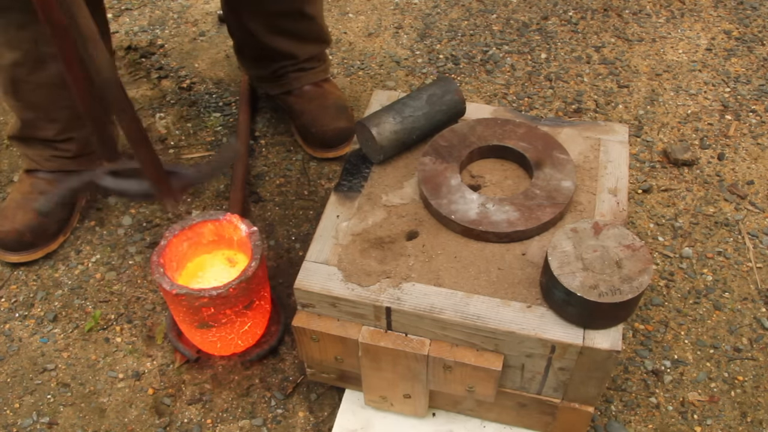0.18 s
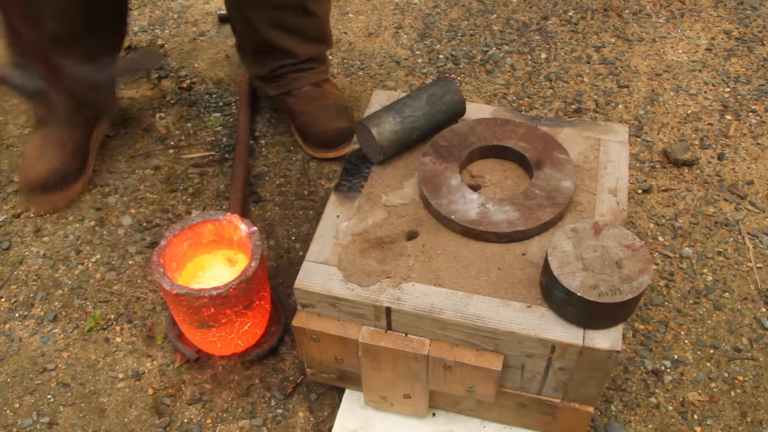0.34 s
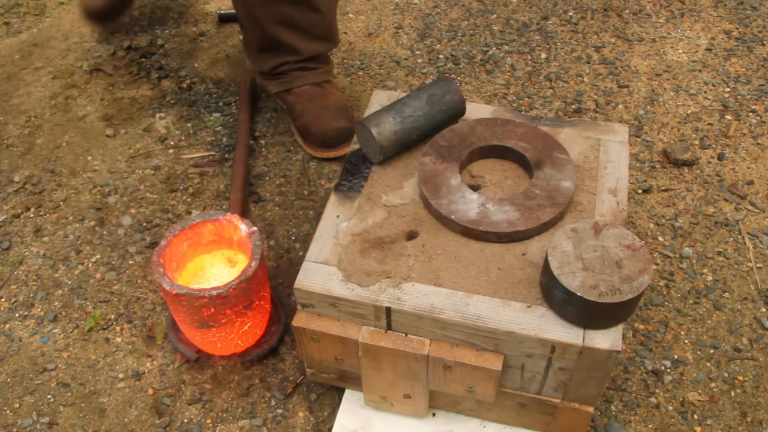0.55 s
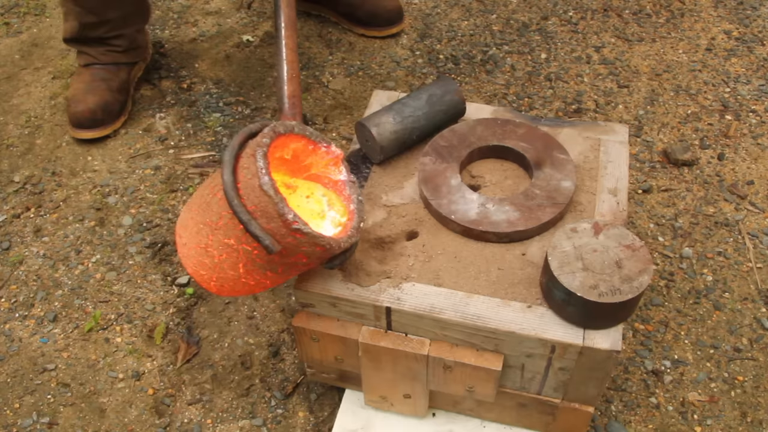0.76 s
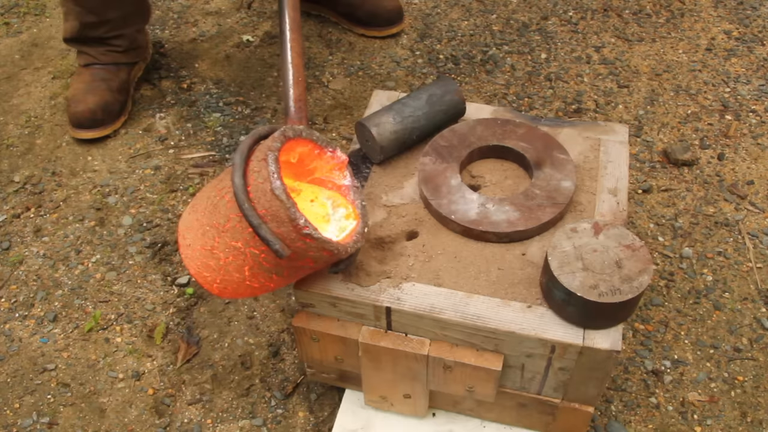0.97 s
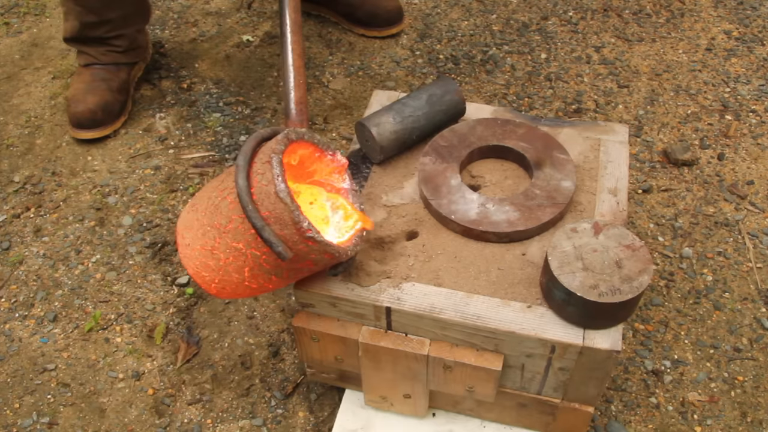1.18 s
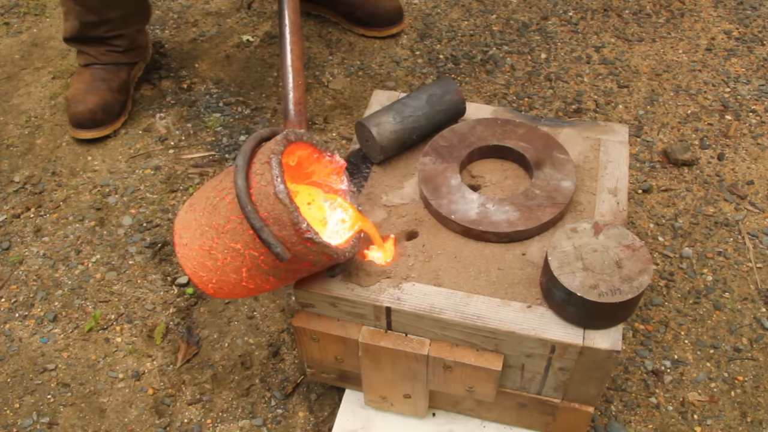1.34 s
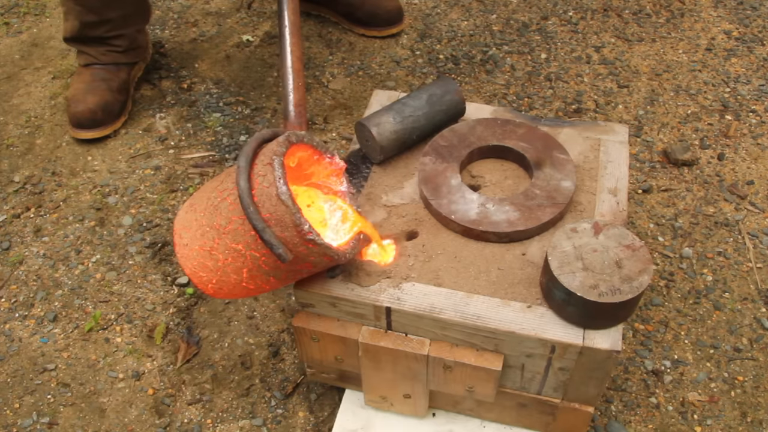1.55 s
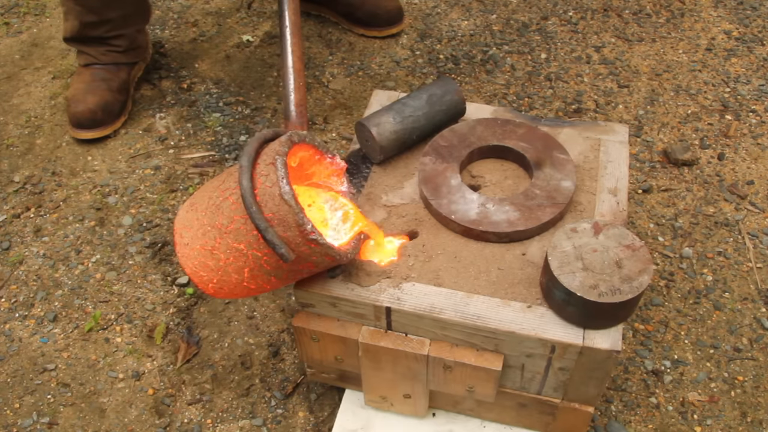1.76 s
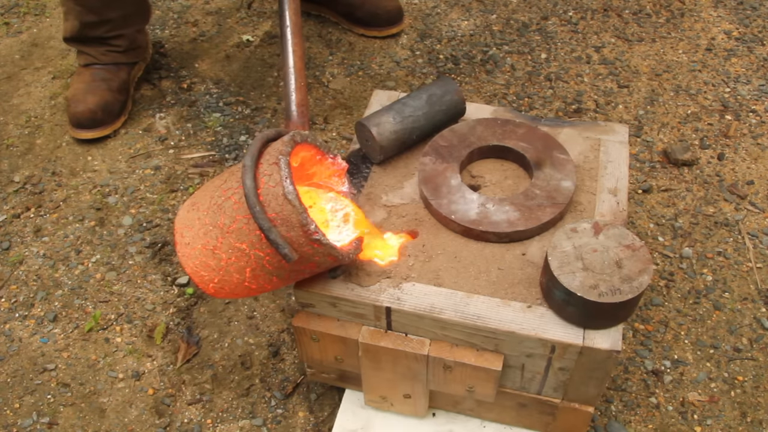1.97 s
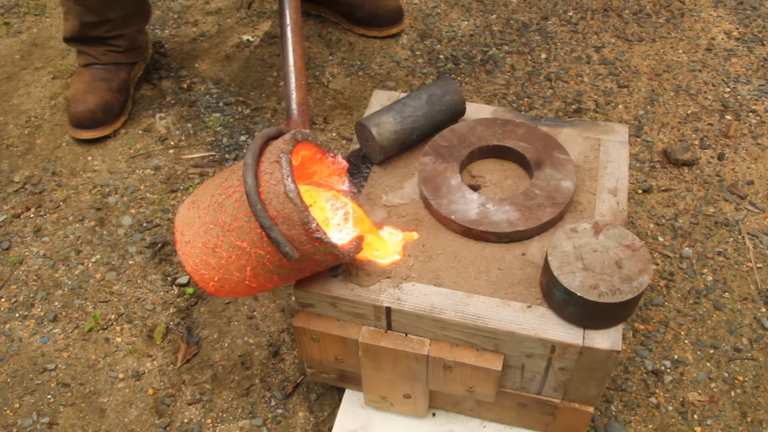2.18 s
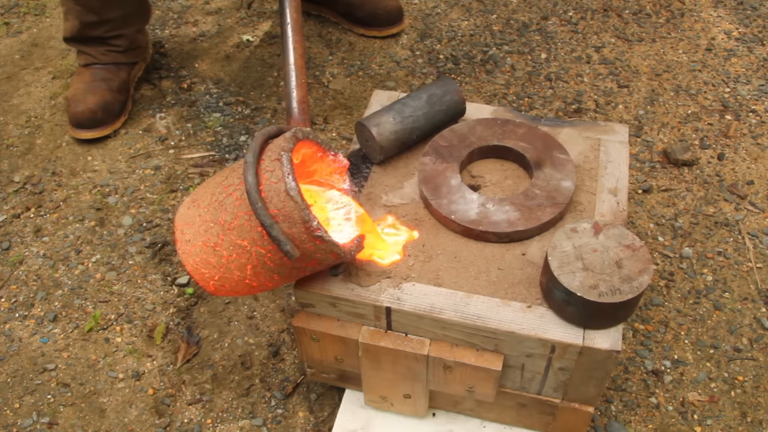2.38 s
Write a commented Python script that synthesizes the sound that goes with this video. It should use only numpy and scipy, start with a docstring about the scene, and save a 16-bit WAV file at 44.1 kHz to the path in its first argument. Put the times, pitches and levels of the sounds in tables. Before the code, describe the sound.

Outdoors, near the microphone, steel tongs clack shut in a bright rattling clink with a soft low bloom, then quiet rubbing with a thin whistle, a faint steamy hiss and tiny crackles over low air rumble.

```python
"""Steel lifting tongs, pulled off a crucible outdoors, snap shut with one sharp clink: seven jaw contacts set
off damped noise bursts and ringing modes, with faint diffuse reflections from the yard. A soft low bloom
follows; the crucible is raised in its ring with a scrape of noise and whistle. Molten metal meets a sand mould:
dense random grains sizzle, steam seeps and single snaps spit. A hiss, a swaying low rumble and puffs of air on
the microphone lie under it all."""
import sys
import numpy as np
from scipy import signal
from scipy.fft import rfft, irfft
from scipy.io import wavfile

SR = 44100
rng = np.random.default_rng(int(sys.argv[2]) if len(sys.argv) > 2 else 0)


def to_wav(s):
    """Save 16-bit WAV."""
    ch = np.atleast_2d(s).T  # columns
    pcm = np.round(np.clip(ch, -1, 1) * 32767)  # PCM
    wavfile.write(sys.argv[1], SR, pcm.astype(np.int16))


N = 105840
TIME_S = np.arange(N) / SR
FREQ_HZ = np.maximum(np.fft.rfftfreq(N, 1 / SR), 1)


def from_db(db):
    """Decibels to amplitude gain."""
    return 10 ** (np.asarray(db) / 20)


def rms_one(x):
    """Scale to unit rms."""
    return x / np.sqrt(np.mean(x ** 2) + 1e-20)


def level(rows):
    """Gain over time from (s, dB) rows, interpolated in dB."""
    return from_db(np.interp(TIME_S, *np.transpose(rows)))


def at_hz(points, hz):
    """Read a table on a log-frequency axis."""
    table_hz, values = np.transpose(points)
    return np.interp(np.log(hz), np.log(table_hz), values)


def colour(x, gain_db):
    """Causal (minimum-phase) filter from gains in dB, via the folded cepstrum."""
    cepstrum = irfft(np.log(from_db(gain_db)), N)
    cepstrum[1:N // 2] *= 2
    cepstrum[N // 2 + 1:] = 0
    impulse = irfft(np.exp(rfft(cepstrum)), N)[:N // 8]
    return signal.fftconvolve(x, impulse)[:N]


def noise(spectrum):
    """Unit-rms Gaussian noise with a given spectrum."""
    white = rfft(rng.standard_normal(N))
    return rms_one(irfft(white * from_db(at_hz(spectrum, FREQ_HZ)), N))


def drift(corner_hz):
    """Unit-rms random wandering, low-passed at corner_hz."""
    white = rfft(rng.standard_normal(N))
    return rms_one(irfft(white / (1 + (FREQ_HZ / corner_hz) ** 2), N))


def decay(start_s, t60_s):
    """Sudden start, exponential fall of 60 dB in t60_s."""
    age_s = np.maximum(TIME_S - start_s, 0)
    return (TIME_S >= start_s) * np.exp(-np.log(1000) * age_s / t60_s)


# Jaw contacts, shared by clash and ringing.
# Each row: start in seconds, relative strength in dB, place along the jaw from 0 (tip) to 1 (curve).
JAW_CONTACTS = [(.2483, 1, 0), (0.2513, -1, 0), (.2536, -8.5, 0.45), (.2558, -0.5, 1), (.2580, -6, 1),
                (0.2613, -6, 0.67), (0.283, -16, 0.39)]
# Dense, quickly damped modes. Each row: frequency in Hz, relative density in dB per Hz.
CLASH_SPECTRUM = [(200, -41), (500, -17.5), (1100, -10), (1350, -12.5), (1700, -1.5), (2100, -3),
                  (2500, -4), (3500, -1.5), (5200, -2), (7000, 0.5), (8100, -8), (8600, -6), (9600, -1.5),
                  (10300, -13.5), (16000, -15.5)]
CLASH_DB, CLASH_T60_S = -16.5, 0.054


def clash():
    """Each jaw contact excites dense, damped modes, heard as a decaying noise burst."""
    out = np.zeros(N)
    for start_s, strength_db, _ in JAW_CONTACTS:
        burst = decay(start_s, CLASH_T60_S) * noise(CLASH_SPECTRUM)
        out += from_db(CLASH_DB + strength_db) * burst
    return out


# Ringing modes of the tongs. Each row: frequency in Hz, relative level in dB struck at the tip,
# relative level in dB struck on the curve, t60 in seconds before division by RING_DAMPING.
TONG_MODES = [(1588, -35, -32, .07), (1809, -35, -35, .08), (2030, -28, -38, .11), (3353, -35, -15, .08),
              (4120, -26, -28, .10), (4240, -28, -30, .09), (4367, -27, -38, .05), (4897, -25, -29, .10),
              (5298, -13, -29, .065), (5433, -17, -26, .08), (5856, -26, -28, .12), (6006, -31, -31, .11),
              (6468, -27, -29, .11), (6654, -32, -25, .08), (6978, -28, -35, .08), (7364, -32, -16, .09),
              (8247, -27, -37, .08), (8861, -33, -22, .12), (9100, -33, -36, .11), (9280, -44, -41, .16),
              (9688, -35, -33, .11), (10510, -45, -43, .08), (11850, -45, -38, .07)]
RING_DB, RING_DAMPING = -1, 1.32
FLUTTER_DEPTH, FLUTTER_HZ = 0.4, 45.5  # depth: relative amplitude and phase in radians, rms


def ringing():
    """Contacts feed energy to each mode by place; the loose jaws make the modes waver."""
    start_s, strength_db, place = np.transpose(JAW_CONTACTS)
    contact_samples = (start_s * SR).astype(int)
    out = np.zeros(N)
    for hz, tip_db, curve_db, t60_s in TONG_MODES:
        mode_db = (1 - place) * tip_db + place * curve_db
        blows = np.zeros(N)
        blows[contact_samples] = from_db(RING_DB + strength_db + mode_db) ** 2
        energy_kept = np.exp(-2 * np.log(1000) * RING_DAMPING / (t60_s * SR))  # per sample
        energy = signal.lfilter([1], [1, -energy_kept], blows + 1e-24)
        phase = 2 * np.pi * (hz * TIME_S + rng.random()) + FLUTTER_DEPTH * drift(FLUTTER_HZ)
        waver = 1 + FLUTTER_DEPTH * drift(FLUTTER_HZ)
        out += np.sqrt(energy) * waver * np.sin(phase)
    return out


# Yard reflections. Each row: frequency in Hz, gain in dB.
YARD_GAIN = [(150, -7), (300, -3.5), (450, -12), (750, -9.5), (1500, -20), (2500, -20.5), (3400, -22),
             (4300, -21.5), (5300, -27), (6000, -21.5), (7400, -25.5), (8850, -27.5), (9600, -25),
             (15000, -26)]
# Each row: frequency in Hz, t60 in seconds.
YARD_T60 = [(200, 1), (600, 0.95), (1400, 0.7), (3700, 0.66), (9700, 0.62)]
# Swell of the reflections. Each row: frequency in Hz, time constant in seconds.
YARD_BUILD = [(300, 0.084), (800, 0.064), (2000, 0.016)]


def yard(x):
    """Faint diffuse reflections as banded decaying noise; lows swell slowest and last longest."""
    white, response = rfft(rng.standard_normal(N)), np.zeros(N)
    edges_hz = np.geomspace(100, 18000, 12)
    for low_hz, high_hz in zip(edges_hz, edges_hz[1:]):
        centre_hz = np.sqrt(low_hz * high_hz)
        swell = 1 - np.exp(-TIME_S / at_hz(YARD_BUILD, centre_hz))
        envelope = decay(0, at_hz(YARD_T60, centre_hz)) * swell
        band = irfft(white * (FREQ_HZ >= low_hz) * (FREQ_HZ < high_hz), N)
        response += band * envelope / np.linalg.norm(envelope)
    return colour(signal.fftconvolve(x, response)[:N], at_hz(YARD_GAIN, FREQ_HZ))


# Soft low bloom after the clink. Each row: time in seconds, level in dB.
BLOOM_LEVEL = [(0, -95), (.22, -87), (.27, -60), (.33, -61), (.39, -56.5), (.46, -61.5), (.56, -64.5),
               (.68, -88), (2.4, -100)]
# Each row: frequency in Hz, relative density in dB per Hz.
BLOOM_SPECTRUM = [(70, -10), (150, -7), (290, 1.5), (420, -7.5), (600, -16), (1500, -36), (8000, -60)]


def low_bloom():
    """A soft low bloom follows the clink: low noise under a level curve."""
    return level(BLOOM_LEVEL) * noise(BLOOM_SPECTRUM)


# Rubbing of the carrying ring. Each row: time in seconds, level in dB.
SCRAPE_LEVEL = [(0, -101), (.55, -64), (.68, -73), (.86, -71), (1.05, -65.5), (1.22, -68.5), (1.4, -76),
                (2.4, -96)]
# Each row: frequency in Hz, relative density in dB per Hz.
SCRAPE_SPECTRUM = [(500, -12.5), (850, 4.5), (1400, -12.5), (2800, -1), (4500, -12.5), (6200, -11),
                   (7200, -4), (8300, -29), (15000, -38)]
# Faint wavering whistle. Each row: time in seconds, centre frequency in Hz, level in dB.
WHISTLE = [(.55, 7570, -85), (.67, 7150, -69), (.74, 6550, -71), (.82, 7050, -65.5), (.91, 7300, -69),
           (1.0, 6540, -67), (1.15, 6860, -76), (1.35, 6800, -85.5)]
WHISTLE_CORNER_HZ = 400  # of the two modulating drifts
ROUGHNESS_DB, ROUGHNESS_HZ = 1, 33


def scrape():
    """Uneven rubbing noise plus a gliding narrow-band whistle as the crucible is lifted and tipped."""
    time_s, hz, db = np.transpose(WHISTLE)
    phase = 2 * np.pi * np.cumsum(np.interp(TIME_S, time_s, hz)) / SR
    in_phase = drift(WHISTLE_CORNER_HZ) * np.cos(phase)
    quadrature = drift(WHISTLE_CORNER_HZ) * np.sin(phase)
    whistle = from_db(np.interp(TIME_S, time_s, db)) * rms_one(in_phase + quadrature)
    rubbing = level(SCRAPE_LEVEL) * noise(SCRAPE_SPECTRUM)
    return (rubbing + whistle) * from_db(ROUGHNESS_DB * drift(ROUGHNESS_HZ))


# Sizzle as the metal spreads. Each row: time in seconds, level in dB.
SIZZLE_LEVEL = [(0, -89), (1.3, -91), (1.42, -85), (1.6, -69), (1.72, -71), (2.0, -66), (2.14, -61),
                (2.26, -70), (2.4, -66)]
# Each row: frequency in Hz, relative density in dB per Hz.
SIZZLE_SPECTRUM = [(1500, -17), (3000, -19), (6000, 6), (10000, 5.5), (16000, 3)]
GRAINS_PER_S, GRAIN_SPREAD_DB = 6000, 6


def sizzle():
    """Metal on sand sets off tiny bursts: random impulses of exponential dB size, coloured."""
    size_db = GRAIN_SPREAD_DB * np.minimum(rng.exponential(1, N), 4)
    sizes = from_db(size_db) * rng.choice([-1, 1], N)
    grains = sizes * (rng.random(N) < GRAINS_PER_S / SR)
    return level(SIZZLE_LEVEL) * rms_one(colour(grains, at_hz(SIZZLE_SPECTRUM, FREQ_HZ)))


# Steam and gas seeping through the sand. Each row: time in seconds, level in dB before flicker.
STEAM_LEVEL = [(0, -86), (1.1, -89), (1.38, -68), (1.65, -72), (1.92, -74), (2.4, -73)]
# Each row: frequency in Hz, relative density in dB per Hz.
STEAM_SPECTRUM = [(1200, -27), (2300, -10), (3200, 10), (4500, -9), (8000, -20)]
STEAM_FLICKER_DB, STEAM_FLICKER_HZ = 4, 15


def steam():
    """Unevenly seeping steam and gas: coloured noise with a wandering level."""
    flicker = from_db(STEAM_FLICKER_DB * drift(STEAM_FLICKER_HZ))
    return level(STEAM_LEVEL) * noise(STEAM_SPECTRUM) * flicker


# Spits of the hot sand.
# Each row: start in seconds, relative strength in dB, lower band edge in Hz, upper band edge in Hz.
SPITS = [(1.1645, -32.5, 1596, 11100), (1.4585, -26.5, 2780, 6000), (1.506, -41.5, 3000, 14900),
         (1.572, -40, 5000, 15000), (1.625, -41, 7000, 15000), (1.972, -39, 6000, 14900),
         (2.0807, -35.5, 3030, 15100), (2.1625, -32, 3000, 14000), (2.1892, -35, 5400, 14000),
         (2.2237, -33.5, 5000, 13000), (2.286, -34.5, 3500, 13000), (2.326, -25.5, 2340, 13800),
         (2.3925, -37, 3480, 13000)]
SPIT_DB, SPIT_TAIL_DB, SPIT_T60_S = 5.5, -20, 0.016


def spits():
    """Sharp snaps in the sand: a band-passed impulse with a short decaying noise spray."""
    size = 2048
    out = np.zeros(2 * N)
    for start_s, strength_db, low_hz, high_hz in SPITS:
        snap = from_db(SPIT_TAIL_DB) * rng.standard_normal(size) * decay(0, SPIT_T60_S)[:size]
        snap[0] += 1
        band = signal.butter(2, [low_hz, high_hz], "band", fs=SR, output="sos")
        start = int(start_s * SR)
        out[start:start + size] += from_db(SPIT_DB + strength_db) * signal.sosfilt(band, snap)
    return out[:N]


# Outdoor hiss. Each row: frequency in Hz, relative density in dB per Hz.
AIR_SPECTRUM = [(59, -36), (100, 1), (181, -5.5), (206, -10), (234, -9), (381, -10.5), (433, -12.5),
                (721, -12.5), (1010, -16), (2690, -15.5), (3540, -17), (6700, -16.5), (16000, -35.5)]
AIR_DB = -58


def air():
    """Steady outdoor hiss: coloured noise."""
    return from_db(AIR_DB) * noise(AIR_SPECTRUM)


# Low rumble. Each row: frequency in Hz, relative density in dB per Hz.
RUMBLE_SPECTRUM = [(10, 3), (25, -3), (45, -11.5), (72, -7.5), (95, -16.5), (118, -14), (150, -30),
                   (300, -56)]
RUMBLE_DB, RUMBLE_SIDE_DB = -57, -19  # side: relative to the centre
RUMBLE_SWAY_DB, RUMBLE_SWAY_HZ = 1.0, 6.4


def rumble():
    """Swaying low noise, with a weak opposite-polarity part that differs left to right."""
    side = from_db(RUMBLE_SIDE_DB) * noise(RUMBLE_SPECTRUM) * np.array([[1], [-1]])
    sway_db = RUMBLE_SWAY_DB * drift(RUMBLE_SWAY_HZ)
    return from_db(RUMBLE_DB + sway_db) * (noise(RUMBLE_SPECTRUM) + side)


# Puffs of air on the microphone. Each row: centre in seconds, peak level in dB.
PUFFS = [(.06, -56.5), (.29, -48.5), (1.04, -47), (1.22, -51), (1.66, -48)]
# Each row: frequency in Hz, relative density in dB per Hz.
PUFF_SPECTRUM = [(12, -2), (25, -1.5), (50, -12), (100, -25), (200, -67)]
PUFF_SIGMA_S = 0.029


def puffs():
    """Air buffeting the microphone: very low noise in Gaussian swells."""
    swells = np.zeros(N)
    for centre_s, peak_db in PUFFS:
        swells += from_db(peak_db) * np.exp(-((TIME_S - centre_s) / PUFF_SIGMA_S) ** 2 / 2)
    return swells * noise(PUFF_SPECTRUM)


YARD_RING_DB = -1.5  # share of the ringing that reaches the reflecting surfaces


def scene():
    """Sum of all sources, central but for the rumble's side part; the yard reflects clink and spits."""
    sharp, ring = clash() + spits(), ringing()
    reflections = yard(sharp + from_db(YARD_RING_DB) * ring)
    clink_and_spits = sharp + ring + reflections
    background = air() + rumble() + puffs()
    return clink_and_spits + low_bloom() + scrape() + sizzle() + steam() + background


CEILING, STOPBAND_HZ = 0.92, 16700


def record(dry):
    """Round the loudest peaks with tanh, then cut the top with a steep low-pass."""
    rounded = CEILING * np.tanh(dry / CEILING)
    low_pass = signal.cheby2(16, 70, STOPBAND_HZ, fs=SR, output="sos")
    return signal.sosfilt(low_pass, rounded)


dry = scene()
out = record(dry)
to_wav(out)
```